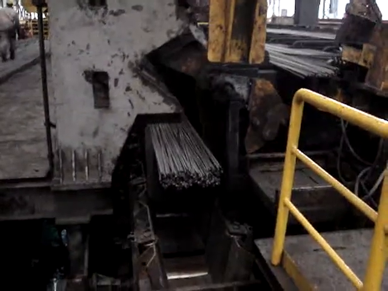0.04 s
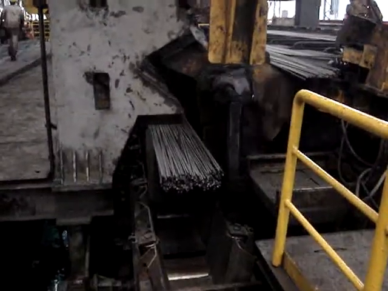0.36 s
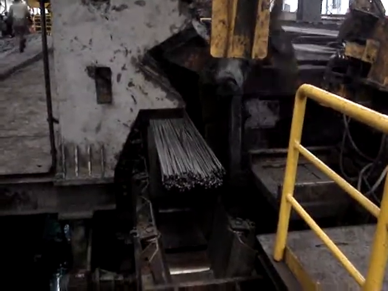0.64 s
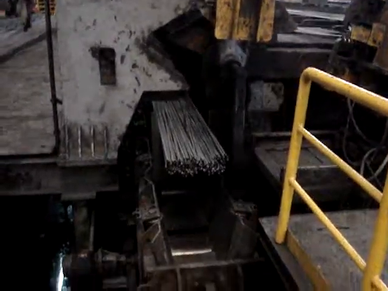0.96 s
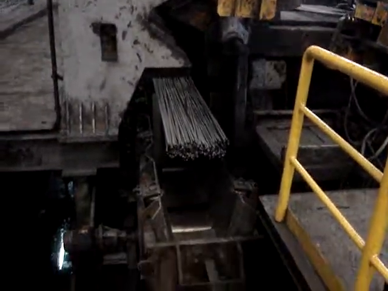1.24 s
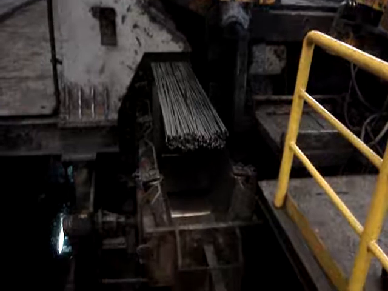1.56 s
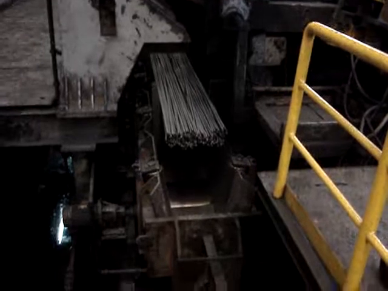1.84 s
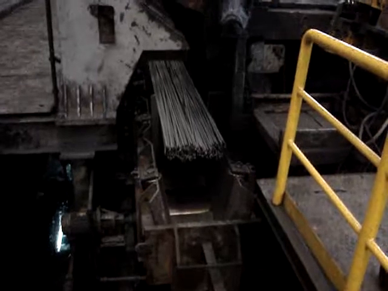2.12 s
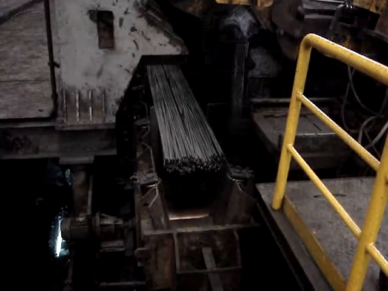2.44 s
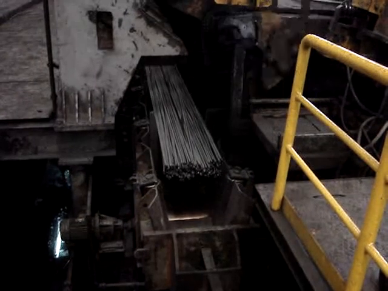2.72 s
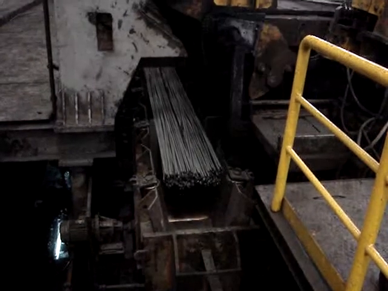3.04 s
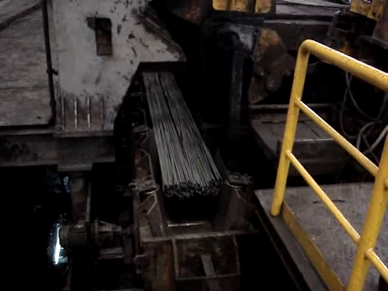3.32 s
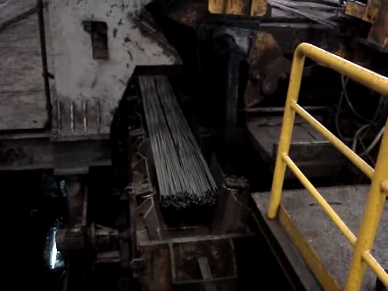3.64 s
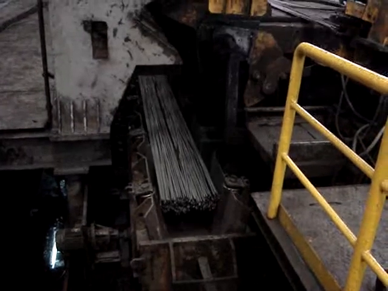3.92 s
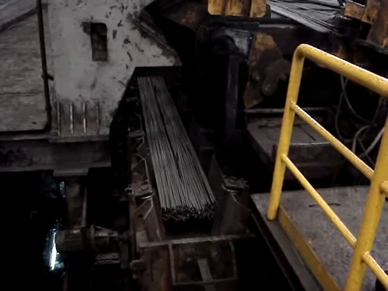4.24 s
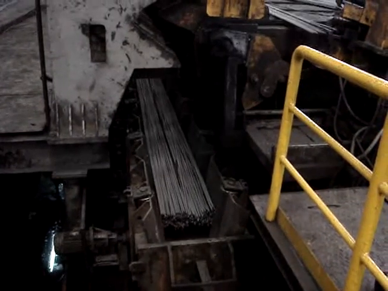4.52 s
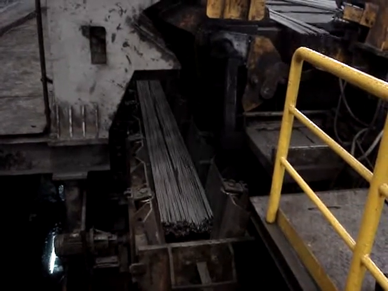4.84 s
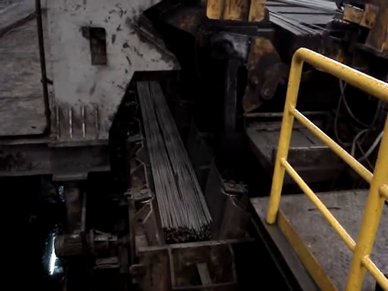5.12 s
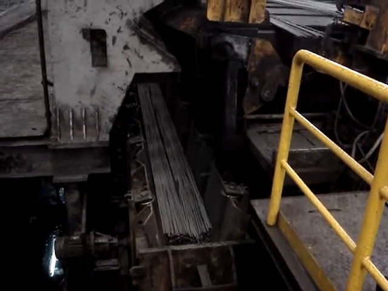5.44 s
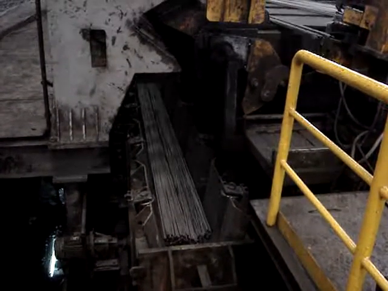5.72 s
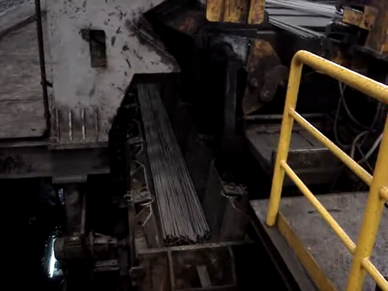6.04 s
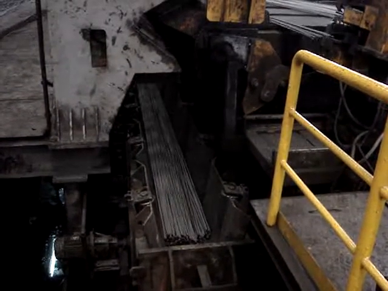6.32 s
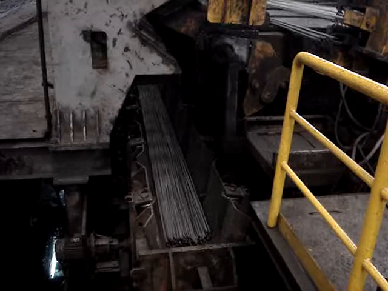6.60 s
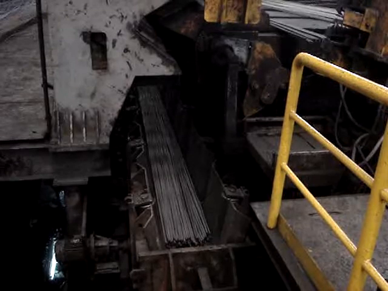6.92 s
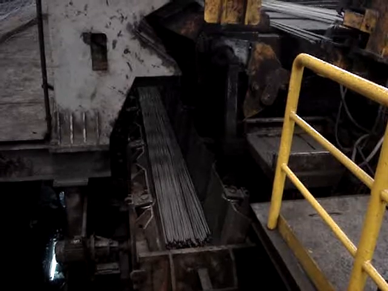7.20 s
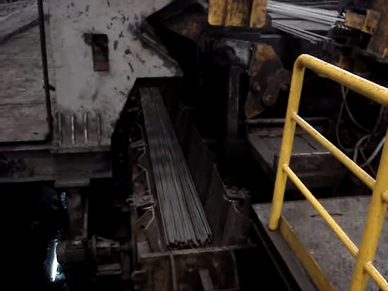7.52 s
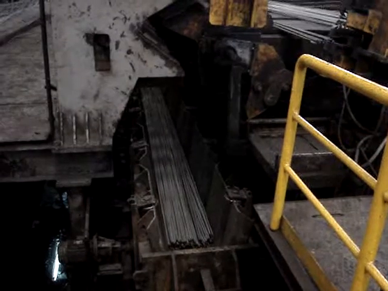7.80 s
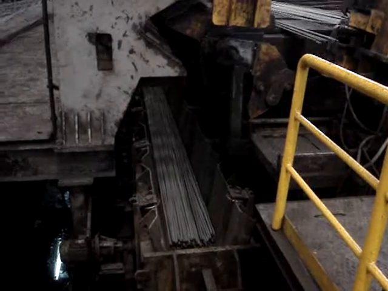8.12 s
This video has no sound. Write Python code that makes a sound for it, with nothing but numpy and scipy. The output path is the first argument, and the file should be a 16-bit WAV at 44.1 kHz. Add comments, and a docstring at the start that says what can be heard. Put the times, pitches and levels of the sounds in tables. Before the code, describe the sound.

A bundle of steel bars slides along a roller trough with a bright, continuous hiss over the loud roar of a rolling mill. Drives whine faintly underneath. About three seconds in, a hard knock rings the trough, followed by a short, sharp squeal. In the second half the bars scrape and clash more heavily, with thin squeaks, and another squeal comes at the end. One microphone picks it up in a reverberant hall.

```python
"""A steady roar and hiss fill a rolling mill as a bundle of steel bars slides along a roller trough.
Countless small contacts make the hiss; drives whine under load, and friction excites modes of the steel
into squeals. Knocks ring the trough; later the bars scrape and clash more heavily. The hall reverberates,
and one microphone with a narrow band and automatic gain takes it in."""
import sys
import numpy as np
from scipy import signal
from scipy.fft import rfft, irfft, next_fast_len
from scipy.io import wavfile
from scipy.ndimage import uniform_filter1d, map_coordinates

SR = 44100
rng = np.random.default_rng(int(sys.argv[2]) if len(sys.argv) > 2 else 0)


def output_pcm(signal):
    """Save a mono or channel-first signal as 16-bit PCM at the path in sys.argv[1].

    Samples are clipped to [-1, 1] before scaling.
    """
    pcm = np.clip(np.atleast_2d(signal).T, -1, 1) * 32767
    wavfile.write(sys.argv[1], SR, np.round(pcm).astype(np.int16))


N = 359856

SQUEAL_HZ, LOW_SQUEAL_HZ = 2191, 1322  # two modes of the steel
# The spectrum of struck bars. Each row: frequency in Hz, relative density in dB.
BARS = [(40, -36), (120, -27), (350, -12.5), (700, 1), (1900, 6), (2700, -0.5), (3400, -0.5), (5000, -9.5),
        (7500, -16), (10200, -26)]


def amp(db):
    """Amplitude grows tenfold for every 20 dB."""
    return 10 ** (np.asarray(db) / 20)


def unit(x):
    """Normalisation to rms 1."""
    return x / np.sqrt(np.mean(x ** 2) + 1e-20)


def clock():
    """Uniform sampling: the time of each sample in seconds."""
    return np.arange(N) / SR


def along(points, hz):
    """Interpolation of (Hz, value) points on a logarithmic frequency axis."""
    frequencies, values = np.transpose(points)
    return np.interp(np.log(hz + 1), np.log(frequencies + 1), values)


def curves(rows):
    """Linear interpolation in time: one curve for each column after the first."""
    times, *columns = np.transpose(rows)
    return [np.interp(clock(), times, column) for column in columns]


def wobble(rate):
    """Smooth random modulation: a spline through `rate` knots a second."""
    knots = np.random.default_rng(rng.integers(2 ** 31)).standard_normal(int(N * rate / SR) + 4)
    coarse = clock()[::64]
    return np.interp(clock(), coarse, map_coordinates(knots, [coarse * rate]))


def swell(peak_s, rise, fall):
    """A Gaussian envelope of height 1, with its own rise and fall in seconds."""
    t = clock() - peak_s
    return np.exp(-np.minimum((t / np.where(t < 0, rise, fall)) ** 2, 20))


def filtered(x, response):
    """Linear filtering: the spectrum of x times a frequency response."""
    size = x.shape[-1]
    padded = next_fast_len(size + SR // 10, True)
    return irfft(rfft(x, padded) * response(np.fft.rfftfreq(padded, 1 / SR)), padded)[..., :size]


def coloured(x, spectrum):
    """Spectral shaping of x by (Hz, dB) points, at rms 1."""
    return unit(filtered(x, lambda hz: amp(along(spectrum, hz))))


def patchy(depth_db):
    """White noise modulated by random patches of gain in time and frequency."""
    spectra = signal.stft(rng.standard_normal(N), nperseg=512)[2]
    patches = uniform_filter1d(rng.standard_normal(spectra.shape), size=8, axis=0)
    patches = uniform_filter1d(patches, size=14, axis=1)
    return unit(signal.istft(spectra * amp(depth_db * unit(patches)), nperseg=512)[1][:N])


def resonance(centre_hz, width_hz):
    """A resonance driven by noise, at rms 1; the response halves width_hz from the centre."""
    return unit(filtered(rng.standard_normal(N), lambda hz: 1 / (1 + ((hz - centre_hz) / width_hz) ** 2)))


def tone(hz, drift_hz, flutter_db):
    """A sinusoid of rms 1 under random frequency and amplitude modulation."""
    phase = 2 * np.pi * np.cumsum(hz + drift_hz * wobble(25)) / SR
    return unit(np.sin(phase) * amp(flutter_db * wobble(14)))


def contacts(rate, spread_db):
    """Shot noise: tiny impacts of uneven size, `rate` a second on average."""
    struck = rng.random(N) < rate / SR
    signs = rng.choice([-1, 1], N)
    sizes = amp(spread_db * np.clip(rng.standard_normal(N), -2, 2))
    return unit(struck * signs * sizes)


def add(track, start_s, sound):
    """Superposition: a sound joins the track at start_s."""
    start = int(np.clip(round(start_s * SR), 0, N - 1))
    track[start:start + len(sound)] += sound[:N - start]


def blows(rows, attack, t60):
    """Exponential decay: an envelope that jumps and dies away at each (seconds, dB) row."""
    out, t = np.zeros(N), np.arange(SR // 2) / SR
    for start, db in rows:
        add(out, start, amp(db - 60 * t / t60) * (1 - np.exp(-t / attack)))
    return out


def hall(x):
    """Reverberation: convolution with a noise tail that dies soonest in the high treble."""
    # The hall's decay. Each row: frequency in Hz, reverberation time in seconds.
    decay_times = [(200, 1.3), (2000, 3.7), (10000, 0.44)]
    hz, t, spectra = signal.stft(rng.standard_normal(SR), SR, nperseg=256)
    decay = amp(-60 * t / along(decay_times, hz)[:, None])
    tail = signal.istft(spectra * decay, SR, nperseg=256)[1]
    return signal.fftconvolve(x, tail / np.linalg.norm(tail))[:N]


def mill(flicker_db=.5, ring_db_per_roar_db=.45):
    """Forced vibration: the broadband roar of the hall keeps the steelwork ringing."""
    # The roar's spectrum. Each row: frequency in Hz, relative density in dB.
    spectrum = [(20, -13.5), (45, -22.5), (85, -19), (130, -14), (190, -8), (350, -3.5), (550, -2),
                (800, 1.5), (1200, 1.5), (1900, -0.5), (2700, -3.5), (4500, -17), (10000, -28)]
    # The roar grows as the bundle runs out along the trough. Each row: time in seconds, level in dB.
    levels = [(0, -28), (3.5, -28), (5.2, -27.5), (5.7, -24.5), (6.7, -25.5), (7.4, -24.5), (8.16, -22.8)]
    # Modes of the steelwork. Each row: frequency in Hz, half-width in Hz, mean level in dB.
    modes = [(2165, 49, -46), (2240, 70, -38), (2334, 25, -40), (982, 37, -44), (622, 44, -45.5),
             (4570, 180, -43), (5100, 200, -45)]
    roar_db, = curves(levels)
    roar = coloured(patchy(depth_db=1.3) + amp(-8.5) * contacts(rate=400, spread_db=3), spectrum)
    rings = sum(amp(db) * resonance(hz, width) for hz, width, db in modes)
    ring_gain = amp(ring_db_per_roar_db * (roar_db - roar_db.mean()))
    return amp(roar_db + flicker_db * wobble(20)) * roar + ring_gain * rings


def roller_drive(slow_hz=853, fast_hz=865.5, idle_db=-44.5, load_edge_s=.055):
    """Rotation makes two spectral lines, which rise in pitch with speed and sing out under load."""
    # Spells of load. Each row: start in seconds, end in seconds, level in dB.
    loads = [(1.273, 1.55, -34), (1.79, 2.5, -36), (3.72, 4.05, -37.5), (4.398, 5.16, -36.5),
             (5.3, 6.583, -35.5), (6.802, 7.2, -36), (7.8, 8.3, -35)]
    t = clock()
    speed_step = .5 + .5 * np.tanh((t - 3.7) / 1.298)  # one smooth rise, centred on 3.7 s
    hz = slow_hz + (fast_hz - slow_hz) * speed_step
    load = sum(amp(db) * np.clip(np.minimum(t - start, end - t) / load_edge_s + .5, 0, 1)
               for start, end, db in loads)
    upper = tone(hz, drift_hz=4.52, flutter_db=1.5)
    lower = amp(-7.5) * tone(hz * .865, drift_hz=4.14, flutter_db=1.5)
    return np.hypot(amp(idle_db), load) * (upper + lower)


def gear(mesh_hz=1823.5):
    """Periodic tooth contact makes a whine at the mesh frequency."""
    # The strength of the whine. Each row: time in seconds, level in dB.
    levels = [(0, -45), (1.4, -39), (2.2, -45), (2.75, -36), (3.7, -36), (4.8, -38), (5.25, -42),
              (6.2, -35.5), (6.7, -42), (7.55, -33), (8.16, -37)]
    gear_db, = curves(levels)
    return amp(gear_db) * tone(mesh_hz, drift_hz=1.97, flutter_db=1.2)


def motors():
    """Steady rotation: each of the farther motors radiates one slightly wavering line."""
    # Motor tones. Each row: frequency in Hz, level in dB.
    lines = [(180, -62.5), (300.5, -50.5), (744, -47), (909, -43.5), (1130, -44), (1348, -47)]
    return sum(amp(db) * tone(hz, drift_hz=3.24, flutter_db=2.5) for hz, db in lines)


def bumps():
    """Impacts excite damped low resonances: dull bumps on the rollers, deep thuds in the floor."""
    # The bundle bumps on the rollers. Each row: start in seconds, level in dB.
    roller_blows = [(.86, -27), (2.15, -28), (2.25, -29.5), (2.73, -30), (3.06, -31), (7.18, -30)]
    # The heaviest blows shake the floor. Each row: start in seconds, level in dB.
    floor_blows = [(3.07, -50), (3.95, -48), (5.57, -49), (5.82, -54), (6.55, -39), (7.66, -45)]
    rollers = blows(roller_blows, attack=.009, t60=.37) * resonance(centre_hz=567, width_hz=110)
    floor = blows(floor_blows, attack=.011, t60=.34) * resonance(centre_hz=25, width_hz=25)
    return rollers + floor


def squeaks(edge_s=.012):
    """Modulated bands of noise: thin, brief high squeaks near 9 kHz and a fine flickering sizzle."""
    # Thin squeaks. Each row: peak time in seconds, level in dB.
    peaks = [(4.09, -33), (5.5, -30), (6.1, -32), (6.43, -32), (7.35, -32), (7.68, -26), (7.82, -29.5),
             (7.98, -27.5)]
    sizzle_envelope = amp(-33.5 + 2 * wobble(22)) * swell(peak_s=6, rise=.8, fall=.2)
    sizzle = sizzle_envelope * resonance(centre_hz=8700, width_hz=1800)
    chirps = sum(amp(db) * swell(peak_s, edge_s, edge_s) for peak_s, db in peaks)
    return sizzle + chirps * resonance(centre_hz=9170, width_hz=680)


def squeals():
    """Self-excited vibration: rubbing steel locks onto one mode, which swells and lets go."""
    # Squeals. Each row: peak time, rise and fall in seconds, pitch in Hz, level in dB.
    swells = [(.68, 0.12, 0.16, LOW_SQUEAL_HZ, -34), (.95, 0.086, .09, SQUEAL_HZ, -30),
              (1.15, .06, 0.3, SQUEAL_HZ, -34), (3.865, 0.08, 0.057, SQUEAL_HZ, -19),
              (4.11, 0.039, 0.089, SQUEAL_HZ, -34), (5.36, 0.17, .06, SQUEAL_HZ, -31.5),
              (6.1, 0.35, 0.14, SQUEAL_HZ, -33), (8.16, 0.088, .06, SQUEAL_HZ, -17.5)]
    return sum(amp(db) * swell(peak_s, rise, fall) * tone(hz, drift_hz=4, flutter_db=0)
               for peak_s, rise, fall, hz, db in swells)


def knocks(ring_attack_s=.0021, crack_t60=.017):
    """Free vibration: each blow cracks and rings the trough's damped modes at new strengths."""
    # Knocks on the trough. Each row: start in seconds, level in dB.
    strikes = [(3.074, -16), (3.088, -12.5), (3.268, -22), (6.856, -25)]
    # Modes of the trough. Each row: frequency in Hz, relative level in dB, 60 dB decay time in seconds.
    modes = [(672, -6, 0.22), (797, -8.5, 0.31), (1139, -2.5, 0.15), (1235, -6, 0.14), (1530, -13, 0.16),
             (2300, -20, .06)]
    out, t = np.zeros(N), np.arange(SR // 2) / SR
    for start, db in strikes:
        ring = np.zeros(len(t))
        for hz, mode_db, t60 in modes:
            envelope = amp(mode_db + rng.normal(0, 1.5) - 60 * t / t60)
            ring += envelope * np.sin(2 * np.pi * (hz * t + rng.random()))
        crack = amp(-60 * t / crack_t60) * coloured(rng.standard_normal(len(t)), BARS)
        add(out, start, amp(db) * (ring * (1 - np.exp(-t / ring_attack_s)) + crack))
    return out


def clashes(attack_s=.001, hold_s=.011):
    """Modal overlap: many bars strike within a moment, and their crowded modes merge into a crash."""
    # Clashes. Each row: start in seconds, level in dB, treble tilt in dB per octave,
    # 60 dB decay time in seconds.
    strikes = [(.42, -24, -5, 0.6), (3.75, -23.5, -2, 0.18), (3.944, -21, -4, 0.12),
               (4.06, -24.5, -6, 0.25), (4.39, -25, -5, 0.11), (5.58, -17.5, 11, 0.14),
               (5.646, -25, -2, 0.15), (5.823, -19, -2, 0.03), (5.871, -20.5, -4.5, 0.16),
               (6.355, -24, -7, 0.079), (6.5, -24.5, -5, 0.099), (6.549, -17, 8, 0.18),
               (6.649, -18.5, 2.5, 0.19), (6.849, -21.5, -6, 0.15), (6.965, -26, -2, .08),
               (7.015, -22, -5, .04), (7.187, -20, 1.5, 0.15), (7.339, -22, 4, 0.11),
               (7.669, -23.5, -1, 0.16), (7.84, -24, -7, 0.13), (8.125, -26, -3, 0.1)]
    out, t = np.zeros(N), np.arange(SR // 2) / SR
    for start, db, tilt, t60 in strikes:
        noise = rng.standard_normal(len(t))
        crash = unit(filtered(noise, lambda hz: amp(along(BARS, hz) + tilt * np.log2(1 + hz / 500))))
        envelope = amp(db - 60 * np.maximum(t - hold_s, 0) / t60) * (1 - np.exp(-t / attack_s))
        add(out, start, envelope * crash)
    return out


def sliding(hiss_flicker_db=.5, rub_flicker_db=1):
    """Sliding friction: small contacts hiss under the bars, which rub together; scrapes add in power."""
    # The steady slide. Each row: time in seconds, hiss level in dB, rubbing level in dB.
    levels = [(0, -23.5, -27), (2.2, -23, -27.5), (3.9, -23, -30.5), (5.2, -24, -32), (6.35, -26, -43),
              (6.85, -23.8, -28.5), (7.65, -25.5, -26), (7.69, -28.5, -31), (8.16, -24.5, -30)]
    # The bars bind and scrape. Each row: peak time, rise and fall in seconds, hiss and rubbing in dB.
    scrapes = [(4.35, .1, 0.32, -28, -30), (4.96, 0.14, 0.18, -24, -37), (6.58, 0.04, 0.1, -26, -21),
               (7.22, 0.12, 0.083, -22.5, -23), (7.33, 0.16, 0.29, -43, -25)]
    # The spectra of hiss and rubbing. Each row: frequency in Hz, relative density in dB.
    hiss_spectrum = [(300, -25), (1200, -9.5), (2600, -5.5), (3500, 0), (5000, 1.5), (6200, -1), (7500, -3),
                     (8900, -6.5), (9400, -4), (10200, -14)]
    rub_spectrum = [(100, -39), (600, -12.5), (1500, -6.5), (3300, -1), (4300, -4), (6000, -9.5),
                    (10200, -24.5)]
    hiss_db, rub_db = curves(levels)
    hiss_power, rub_power = amp(hiss_db) ** 2, amp(rub_db) ** 2
    for peak_s, rise, fall, hiss_peak_db, rub_peak_db in scrapes:
        surge = swell(peak_s, rise, fall)
        hiss_power += (amp(hiss_peak_db) * surge) ** 2
        rub_power += (amp(rub_peak_db) * surge) ** 2
    hiss = coloured(patchy(depth_db=.64) + amp(-2.5) * contacts(rate=3000, spread_db=4.5), hiss_spectrum)
    rub = coloured(rng.standard_normal(N) + contacts(rate=2500, spread_db=3), rub_spectrum)
    hiss_gain = np.sqrt(hiss_power) * amp(hiss_flicker_db * wobble(38))
    rub_gain = np.sqrt(rub_power) * amp(rub_flicker_db * wobble(45))
    return hiss_gain * hiss + rub_gain * rub


def scene():
    """Superposition: all sources sum at one microphone, which feeds both channels."""
    near = knocks() + clashes() + squeals() + squeaks()
    mono = mill() + sliding() + roller_drive() + gear() + motors() + bumps()
    mono += near + amp(-16) * hall(near)
    return np.array([mono, mono])


def record(dry, threshold_db=-21, cut_db_per_db=.48, memory_s=.057, top_hz=10120):
    """Compression and band limiting: the gain drops after loud moments, and the top treble is cut off."""
    pole = np.exp(-1 / (memory_s * SR))
    power = signal.lfilter([1 - pole], [1, -pole], dry[0] ** 2)
    over_db = np.maximum(10 * np.log10(power + 1e-12) - threshold_db, 0)
    compressed = dry * amp(-cut_db_per_db * over_db)
    return filtered(compressed, lambda hz: np.clip((top_hz - hz) / 200 + .5, 0, 1))


dry = scene()
out = record(dry)
output_pcm(out)
```